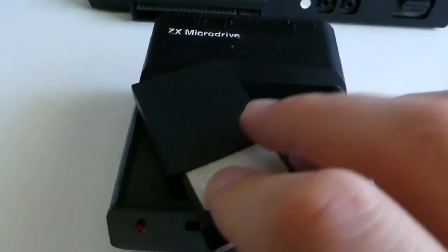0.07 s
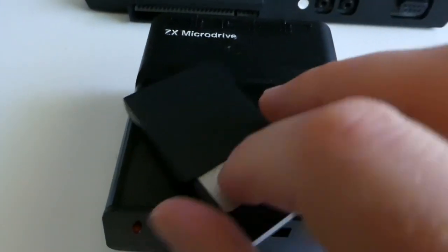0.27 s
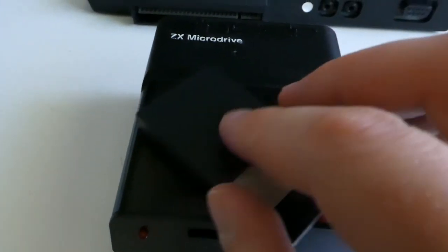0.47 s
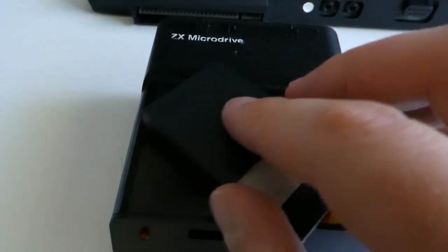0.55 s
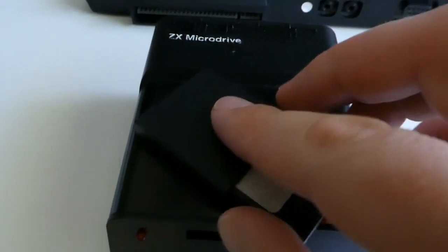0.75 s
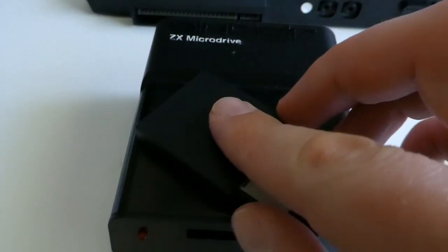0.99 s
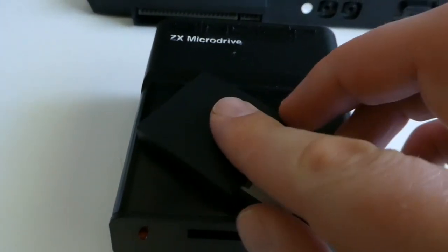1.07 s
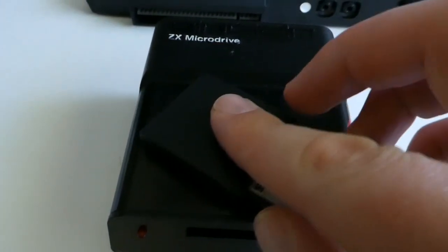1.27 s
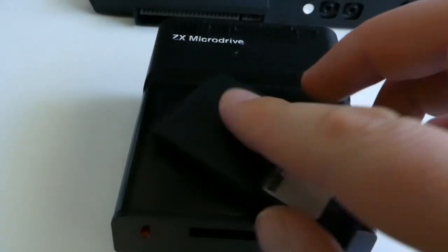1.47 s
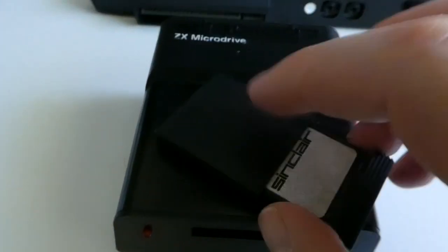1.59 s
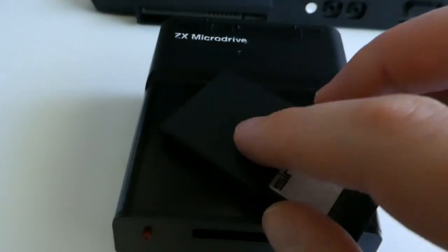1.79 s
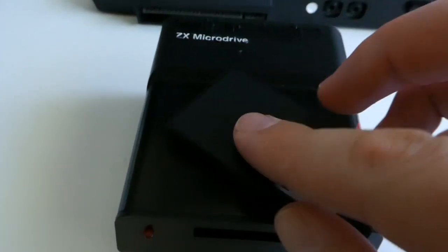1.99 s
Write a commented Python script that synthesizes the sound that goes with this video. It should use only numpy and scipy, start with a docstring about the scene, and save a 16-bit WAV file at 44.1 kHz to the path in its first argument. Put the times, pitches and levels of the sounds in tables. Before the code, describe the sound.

Small plastic cartridge clicking and scraping against a hollow plastic casing, with one loud clack.

```python
"""A table in a quiet room, heard up close. Fingers shift a small plastic cartridge about on a hollow
plastic casing. It scrapes, rocks and knocks against the lid, drops flat with one loud clack, then is
nudged with light ticks. Every knock rings the same casing, and firm pushes also thud into the table.
The scraping is plastic sticking and slipping in tiny, quick steps."""
import sys
import numpy as np
from scipy import signal
from scipy.fft import rfft, irfft, next_fast_len
from scipy.io import wavfile
from scipy.ndimage import map_coordinates

SR = 44100
rng = np.random.default_rng(int(sys.argv[2]) if len(sys.argv) > 2 else 0)


def to_wav(s):
    """Save 16-bit WAV."""
    ch = np.atleast_2d(s).T  # columns
    pcm = np.round(np.clip(ch, -1, 1) * 32767)  # PCM
    wavfile.write(sys.argv[1], SR, pcm.astype(np.int16))


N = 90404


def amp(db):
    """Turn decibels into a gain."""
    return 10 ** (np.asarray(db) / 20)


def unit(x):
    """Scale a sound to an average (rms) level of 1."""
    return x / np.sqrt(np.mean(x ** 2) + 1e-20)


def burst(x):
    """Give a short sound the energy of 10 ms at level 1."""
    return x * np.sqrt(SR / 100 / (np.sum(x ** 2) + 1e-20))


def fade(t, t60):
    """Die away by 60 dB in t60 seconds, the fade time."""
    return np.exp(-np.log(1000) * t / np.maximum(t60, 1e-3))


def along(points, hz):
    """Read smoothly between the rows of a frequency table."""
    freqs, values = np.transpose(points)
    return np.interp(np.log(hz + 1), np.log(freqs + 1), values)


def filtered(x, response):
    """Scale each frequency by response(hz)."""
    n = x.shape[-1]
    padded = next_fast_len(n + 8192)
    return irfft(rfft(x, padded) * response(np.fft.rfftfreq(padded, 1 / SR)), padded)[..., :n]


def noise(colour, size):
    """Noise at level 1, shaped by a table of Hz and dB."""
    return unit(filtered(rng.standard_normal(size), lambda hz: amp(along(colour, hz))))


def add(track, start, x):
    """Mix x into the track at start seconds."""
    i = max(0, round(start * SR))
    part = track[i:i + len(x)]
    part += x[:len(part)]


# The background's tone, in the centre and at the sides. Each row: frequency in Hz, relative level in dB.
HUSH_CENTRE = [(15, -56), (25, -29.5), (267, -4), (666, -11), (919, 0), (1200, -18.5), (1600, -11.5),
               (2560, -10), (5010, -16), (10400, -20.5), (15500, -27.5)]
HUSH_SIDES = [(15, -58), (25, -35), (300, -4), (2490, -20), (15500, -43.5)]

def room_hush():
    """The faint, steady noise of the room, as a centre and a side signal."""
    return amp(-60.5) * noise(HUSH_CENTRE, N), amp(-55.5) * noise(HUSH_SIDES, N)


# How long the room rings. Each row: frequency in Hz, fade time in seconds.
ECHO_FADES = [(150, 0.4), (4000, 0.22), (12000, 0.17)]
# How much sound the room returns. Each row: frequency in Hz, gain in dB.
ECHO_COLOUR = [(100, -1), (500, -13.5), (900, -17.5), (1400, -11.5), (4000, -16.5), (12000, -8)]

def room_echo(x):
    """Many reflections blur into a short tail."""
    freqs, t, spectrum = signal.stft(rng.standard_normal(SR // 2), SR, nperseg=256)
    tail = signal.istft(spectrum * fade(t, along(ECHO_FADES, freqs)[:, None]), SR, nperseg=256)[1]
    tail *= np.minimum(np.arange(len(tail)) / SR / 0.0055, 1)
    returned = filtered(x, lambda hz: amp(along(ECHO_COLOUR, hz)))
    return signal.fftconvolve(returned, tail / np.linalg.norm(tail))[:N]


def near_echoes(x):
    """Sound bounces straight back off the table and hand."""
    t = np.arange(SR // 40) / SR
    echo = rng.standard_normal(len(t)) * fade(t, 0.013)
    return signal.fftconvolve(x, echo / np.linalg.norm(echo))[:N]


# The table's dull tone. Each row: frequency in Hz, relative level in dB.
TABLE_COLOUR = [(25, -36), (110, -15.5), (220, -2), (370, 1), (520, -24), (5000, -50)]
# Pushes that reach the table. Each row: start in seconds, level in dB.
THUDS = [(0.254, -59.5), (0.489, -61.5), (0.512, -50.5), (.631, -46.5), (1.375, -53.5), (1.947, -52)]

def thuds():
    """The table answers firm pushes with a dull bump."""
    out, t = np.zeros(N), np.arange(SR // 5) / SR
    shape = fade(t, t60=.075) * (1 - np.exp(-t / .002))
    for start, db in THUDS:
        add(out, start, amp(db) * burst(noise(TABLE_COLOUR, len(t)) * shape))
    return out


# The plastic's overall tone. Each row: frequency in Hz, relative level in dB.
PLASTIC_COLOUR = [(450, -4.5), (550, 5.5), (680, -6.5), (880, 4.5), (1000, 0.5), (1250, -8.5),
                  (2550, -12.5), (3100, -19.5), (4600, -17), (5600, -21.5), (7500, -31.5), (8200, -39),
                  (8900, -29), (10800, -34.5), (12200, -48), (15500, -64)]
# Four bands, low to high: hollow, ring, clack, tick. Each row: low edge in Hz, high edge in Hz.
BANDS = [(490, 740), (740, 1300), (1300, 3200), (3200, 16000)]

def plastic_band(x, lo, hi):
    """Give a sound the plastic's tone and keep one band of it, at level 1."""
    def response(hz):
        edges = np.sqrt((1 + (lo / (hz + 1)) ** 24) * (1 + (hz / hi) ** 24))
        return amp(along(PLASTIC_COLOUR, hz)) / edges
    return unit(filtered(x, response))


# The casing's own clear notes. Each row: pitch in Hz, relative level in dB, fade time in seconds.
CASING_NOTES = [(554, 0.5, 0.052), (602, 8, 0.039), (680, 8.5, 0.035), (898.5, -2, 0.074), (867.6, 4, 0.05),
                (944, -3, 0.079), (1020, -4, 0.032), (1172, -8, 0.05), (1433, -0.5, 0.018),
                (1603, -5.5, 0.045), (2030, -9.5, 0.022), (2268, -3, 0.009), (2497, -19.5, 0.1),
                (2625, 5, 0.013), (4215, 7, 0.017), (4420, 6, 0.06)]

def casing_response(hz):
    """A rub rings the casing at its own notes, and plain grit is heard beside them."""
    ringing = sum(1 / (1 + 1j * (hz - pitch) * 2 * np.pi * t60 / np.log(1000))
                  for pitch, _, t60 in CASING_NOTES)
    return amp(2) + ringing


def no_bass(x):
    """Nothing below about 460 Hz sounds from the casing's knocks and grit."""
    return signal.sosfilt(signal.ellip(5, 1, 50, 460, 'high', fs=SR, output='sos'), x)


# How each band speaks. Each row: knock gain in dB, slide gain in dB, level in dB of its blur of
# crowded notes against the clear ones, the blur's fade time in seconds.
BAND_VOICES = [(-4.5, -3.5, -24.5, 0.011), (-1, -1.5, -7, 0.0048), (-1, -2, 4, 0.038),
               (-5, -3.5, 9.5, 0.057)]
# Scraping strokes. Each row: start in seconds, length in seconds, four band levels in dB before gain.
SLIDES = [(0, 0.018, -59.5, -49, -59, -81), (0.129, 0.056, -41, -51, -57, -64.5),
          (0.232, 0.046, -37, -36, -44, -52), (0.325, 0.05, -43, -35.5, -51, -50.5),
          (0.487, 0.03, -55, -44.5, -45, -45.5), (0.533, 0.069, -42, -46, -45.5, -44.5),
          (0.724, 0.044, -71, -52.5, -60, -55.5), (1.022, 0.046, -74, -54.5, -61, -62.5),
          (1.144, 0.04, -70, -55, -60, -59), (1.257, 0.06, -63, -49, -60, -59.5),
          (1.452, 0.054, -60, -48, -55, -61), (1.532, 0.039, -60, -40, -51.5, -54),
          (1.617, 0.058, -53, -46.5, -50, -71), (1.796, 0.0091, -57, -51, -46, -56.5)]

def slides():
    """Matt plastic sticks and slips in tiny grains that ring the casing; the table rumbles along."""
    slips_per_s, edge_s, rumble_db = 1400, .007, -13.5
    grit, rumble = np.zeros(N), np.zeros(N)
    for start, length, *levels in SLIDES:
        n = int((length + 2 * edge_s) * SR)
        t = np.arange(n) / SR
        slips = (rng.random(n) < slips_per_s / SR) * rng.choice([-1, 1], n)
        strength = amp(0.5 * rng.standard_normal(n))
        pressure = amp(0.3 * map_coordinates(rng.standard_normal(64), [t * 120], mode='mirror'))
        stroke = np.abs(np.sin(np.pi * t / t[-1])) ** 0.38  # swells, then fades
        rub = filtered(slips * strength * pressure, casing_response)
        for (lo, hi), db, (_, gain_db, _, _) in zip(BANDS, levels, BAND_VOICES):
            add(grit, start - edge_s, amp(db + gain_db) * unit(stroke * plastic_band(rub, lo, hi)))
        add(rumble, start - edge_s, amp(levels[-1] + rumble_db) * unit(stroke * noise(TABLE_COLOUR, n)))
    return no_bass(grit) + signal.sosfilt(signal.butter(4, 180, 'high', fs=SR, output='sos'), rumble)


# Clear pitched rings. Each row: start in seconds, pitch in Hz, level in dB, fade time in seconds.
PINGS = [(0.1184, 876, -32, 0.027), (.254, 578.3, -27.5, 0.046), (.337, 558, -30.5, 0.046),
         (.634, 881, -16, 0.044), (.636, 685.5, -26.5, 0.051), (.636, 2652, -32, 0.045),
         (1.281, 793, -40, 0.044), (1.458, 875, -41, 0.061), (1.656, 2505, -33, 0.011),
         (1.6558, 1140, -33.5, 0.0087), (1.7301, 1650, -47, 0.011), (1.795, 937, -37, 0.033),
         (1.794, 1400, -44, 0.035)]

def pings():
    """On some knocks the casing's notes sound more strongly; a few small pitched taps join them."""
    out, t = np.zeros(N), np.arange(SR // 10) / SR
    for start, hz, db, t60 in PINGS:
        onset = (1 - np.exp(-t / (.14 * t60))) ** 1.5
        add(out, start, amp(db) * burst(np.sin(2 * np.pi * hz * t) * fade(t, t60) * onset))
    return out


# Sharp edges that catch and snap free. Each row: start in seconds, level in dB, pitch in Hz.
SNAPS = [(.257, -43.5, 9260), (0.266, -50.5, 4700), (.345, -42, 5240), (0.55, -50, 5200),
         (0.5643, -42, 5000), (.5726, -46, 4530), (0.6276, -38, 4140), (0.6298, -36, 5000),
         (.6341, -30, 5240), (.6366, -32, 4400), (1.2619, -48.5, 4300), (1.6557, -49, 9280),
         (1.6568, -40, 3350), (1.6773, -49, 5670), (1.9131, -39.5, 4700), (2.0243, -53.5, 5300)]

def snaps():
    """An edge lets go at once: a dry crack and a tiny ring, dull at the very top."""
    out, t = np.zeros(N), np.arange(SR // 40) / SR
    for start, db, hz in SNAPS:
        ring = np.sin(2 * np.pi * hz * t) * fade(t, t60=0.0071) * (1 - np.exp(-(t * hz) ** 2))
        crack = plastic_band(rng.standard_normal(len(t)), *BANDS[-1]) * fade(t, t60=0.0079)
        add(out, start, amp(db) * burst(burst(ring) + amp(-1.5) * burst(crack)))
    return signal.sosfilt(signal.butter(2, 12500, fs=SR, output='sos'), out)


def clear_notes(t, rise, lo, hi):
    """The struck casing rings its notes in one band, a little differently each time."""
    ring, after = np.zeros(len(t)), np.maximum(t - rise, 0)
    for hz, db, t60 in CASING_NOTES:
        if lo <= hz < hi:
            gain = amp(db + 4 * rng.normal())
            pitch = hz * (1 + 0.0048 * rng.normal())
            phase = (hz > 1300) * rng.random()  # low notes start in step
            decay = fade(after, t60) + amp(-26.5) * fade(after, 5.4 * t60)  # a faint ring lingers
            ring += gain * decay * np.sin(2 * np.pi * (pitch * (t - rise) + phase))
    return ring


# The cartridge meets the casing. Each row: start in seconds, four band levels in dB before gain,
# seconds the contact takes to build.
KNOCKS = [(0.0735, -43, -43.5, -55, -56, 0.0017), (0.112, -44.5, -42, -49, -49, 0.0031),
          (0.157, -33, -34, -50, -53, 0.0035), (0.2375, -25, -29.5, -61, -47.5, 0.0013),
          (0.2411, -30, -30, -35.5, -45, 0.00098), (0.2555, -43, -32.5, -33.5, -43, 0.0022),
          (0.2605, -43, -27, -43, -40, 0.00089), (0.3365, -27, -24.5, -34.5, -39, 0.0017),
          (0.345, -32.5, -35, -36.5, -39, 0.00056), (0.369, -32.5, -32.5, -50, -49, 0.00087),
          (0.4835, -44, -46, -42.5, -45, 0.00064), (0.5112, -24.5, -24, -34.5, -43, 0.001),
          (0.541, -25.5, -27.5, -41, -50, 0.0016), (0.551, -35, -22.5, -39, -42, 0.0027),
          (0.5635, -28.5, -28, -36.5, -37, 0.0012), (0.572, -36, -28, -38.5, -42, 0.00033),
          (0.591, -36, -30, -48, -60, 0.00074), (0.6295, -63, -23, -31.5, -44, 0.00088),
          (0.6348, -28, -19.5, -24.5, -28.5, 0.00098), (0.6425, -24, -29, -26.5, -33.5, 0.00085),
          (0.731, -50, -43, -44, -50.5, 0.00068), (0.884, -57.5, -52, -62.5, -71, 0.0011),
          (1.141, -51, -48, -59, -54.5, 0.0014), (1.2452, -59, -39, -47.5, -46.5, 0.0004),
          (1.281, -46, -44.5, -49, -46, 0.0026), (1.374, -46, -44.5, -52.5, -48.5, 0.00155),
          (1.542, -37, -34.5, -38, -47.5, 0.0016), (1.584, -55, -42.5, -43.5, -65, 0.0026),
          (1.6556, -49, -38.5, -36.5, -47, 0.00039), (1.677, -44, -35.5, -55, -44, 0.00043),
          (1.910, -52, -43, -44.5, -59, 0.00124), (1.9475, -39.5, -42, -40.5, -48.5, 0.00026),
          (2.0232, -44, -42, -40, -46, 0.0006)]

def brushes():
    """Surfaces brush just before each knock; softer contacts brush longer and louder."""
    out, t = np.zeros(N), np.arange(SR // 40) / SR
    brush_db, swell_s, soft_rise_s = -11.5, 0.0043, 0.0014
    time_left = t[-1] - t
    for start, *levels, rise in KNOCKS:
        swell = np.exp(-time_left / (swell_s + rise)) * np.minimum(time_left * 1000, 1)
        softness = min(rise / soft_rise_s, 1)
        for (lo, hi), db in zip(BANDS[1:], levels[1:]):
            grit = plastic_band(rng.standard_normal(len(t)), lo, hi)
            add(out, start + rise - t[-1], amp(db + brush_db) * softness * burst(swell * grit))
    return out


def knocks():
    """Each contact rings the casing's clear notes and a blur of crowded ones."""
    out, t = np.zeros(N), np.arange(SR // 5) / SR
    for start, *levels, contact_rise in KNOCKS:
        for (lo, hi), db, (gain_db, _, blur_db, t60) in zip(BANDS, levels, BAND_VOICES):
            rise = np.hypot(contact_rise, 1.095 / lo)  # low bands take longer to speak
            onset = 1 - np.exp(-(t / rise) ** 2)
            clear = clear_notes(t, rise, lo, hi)
            blur = plastic_band(rng.standard_normal(len(t)), lo, hi) * fade(np.maximum(t - rise, 0), t60)
            knock = burst(onset * clear) + amp(blur_db) * burst(onset * blur)
            add(out, start, amp(db + gain_db) * burst(knock))
    return no_bass(out)


def scene():
    """The plastic sits in the centre; echoes, thuds and hush spread around it."""
    direct = brushes() + knocks() + snaps() + pings() + slides() + thuds()
    hush_mid, hush_side = room_hush()
    mid = direct + room_echo(direct) + hush_mid
    side = amp(-7.5) * room_echo(direct) + amp(-22.5) * near_echoes(direct)
    side += amp(-1) * thuds() + hush_side
    return np.array([mid + side, mid - side]) * amp([[.25], [-.25]])  # a touch louder on the left


def record(dry):
    """Nothing above 16000 Hz is heard."""
    return filtered(dry, lambda hz: hz < 16000)


dry = scene()
out = record(dry)
to_wav(out)
```